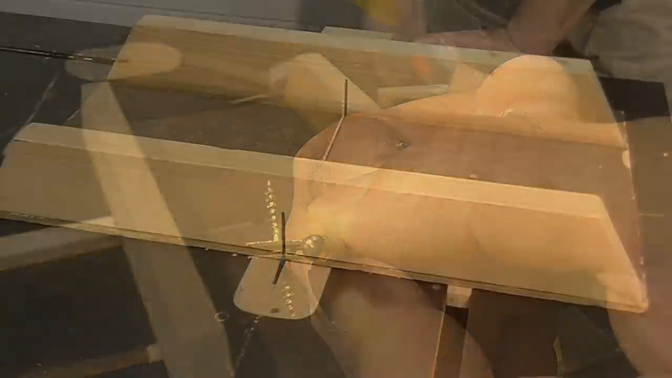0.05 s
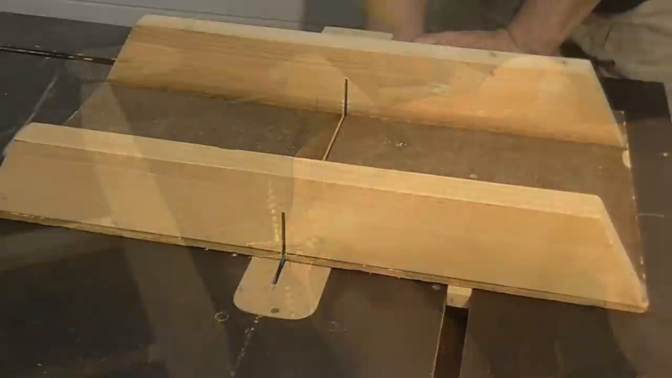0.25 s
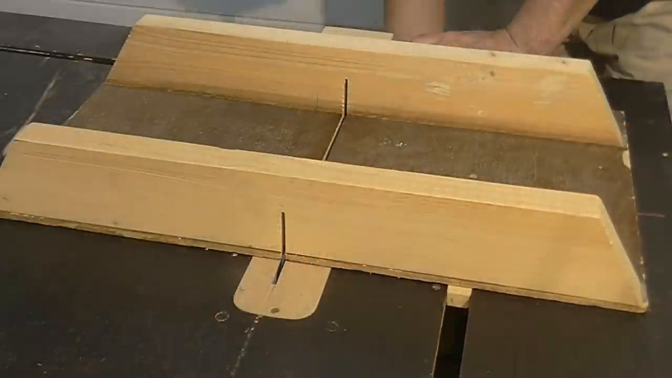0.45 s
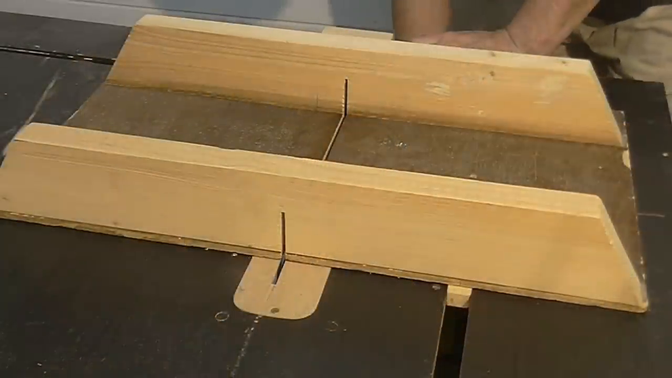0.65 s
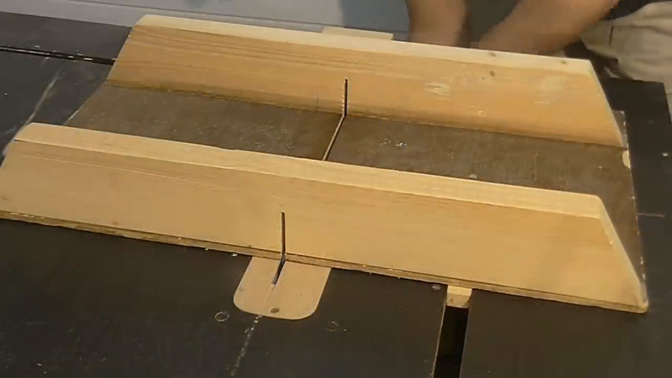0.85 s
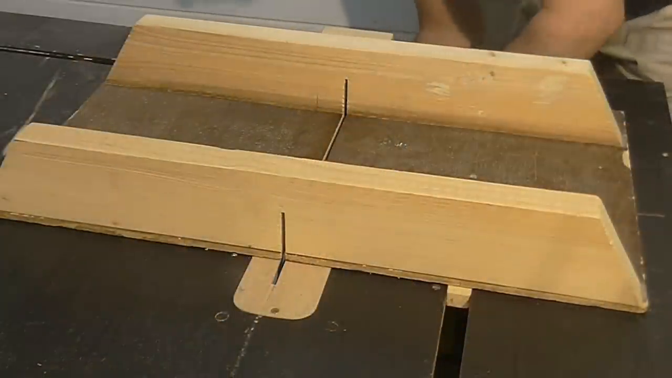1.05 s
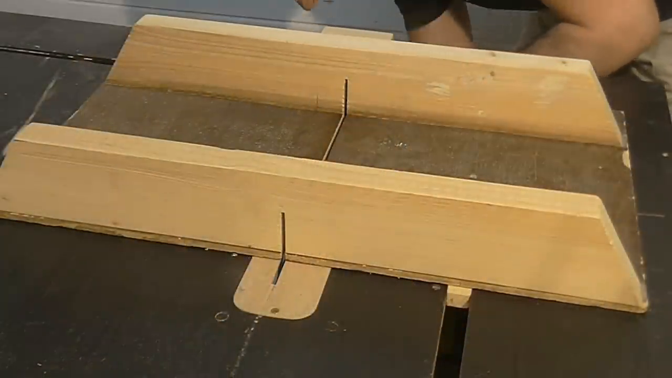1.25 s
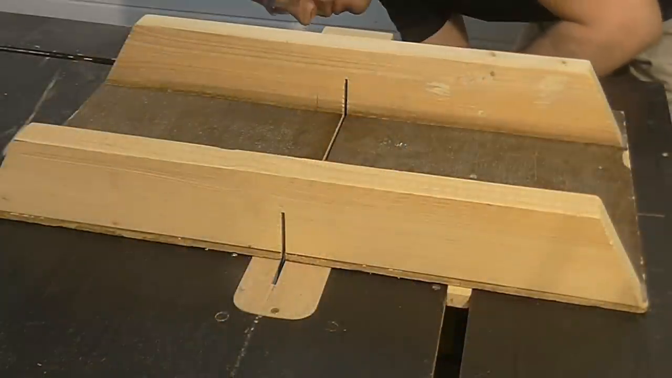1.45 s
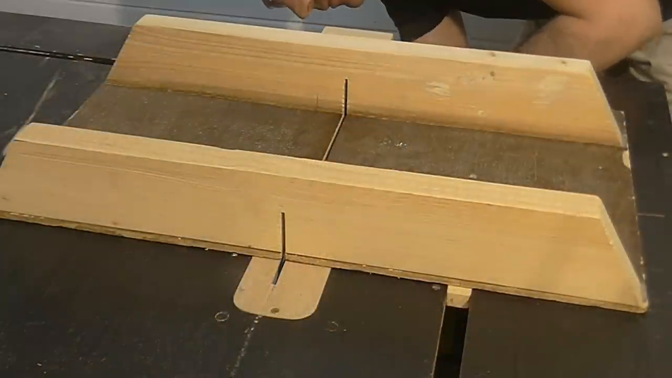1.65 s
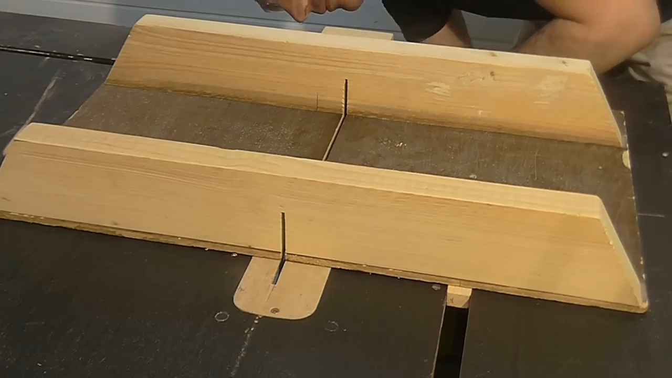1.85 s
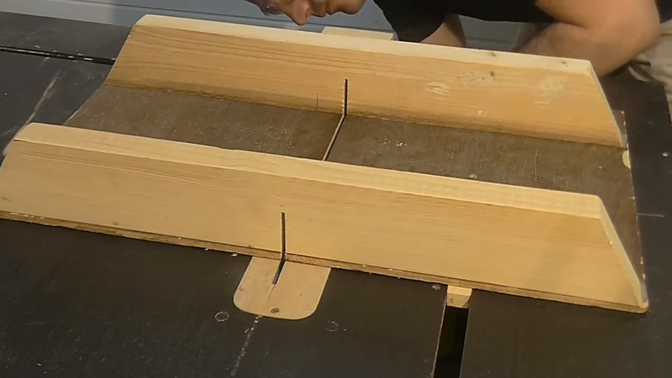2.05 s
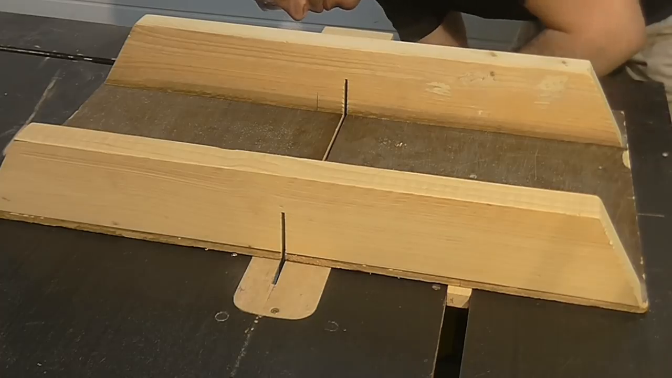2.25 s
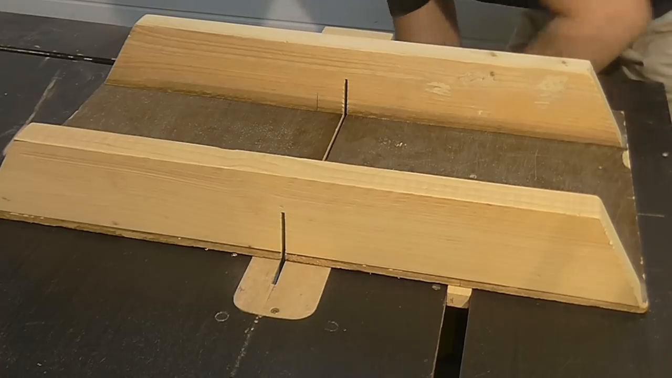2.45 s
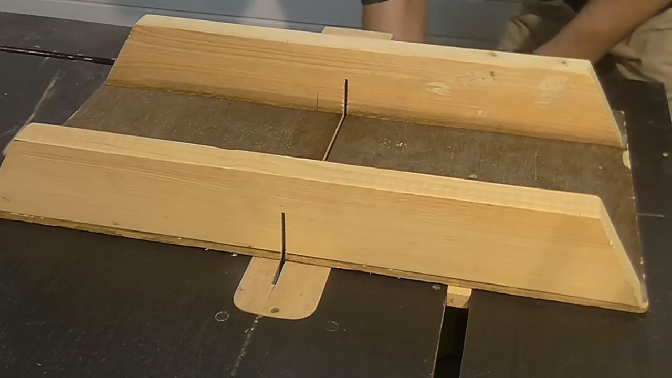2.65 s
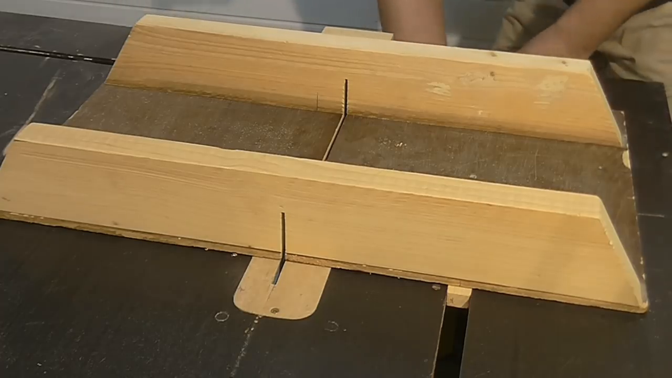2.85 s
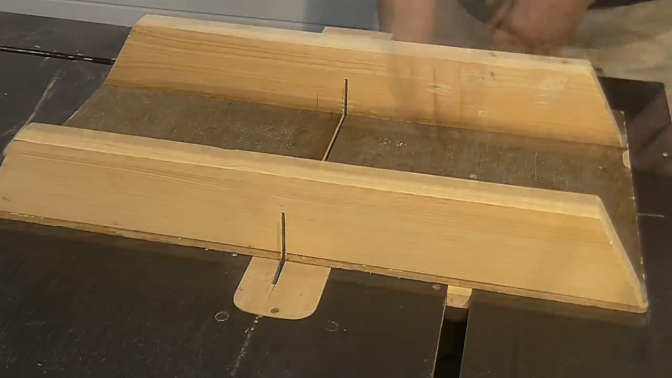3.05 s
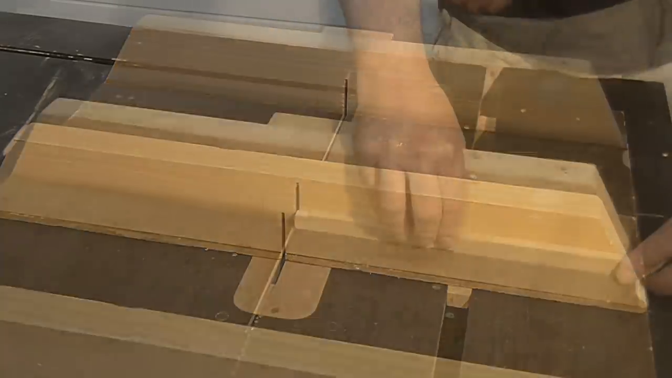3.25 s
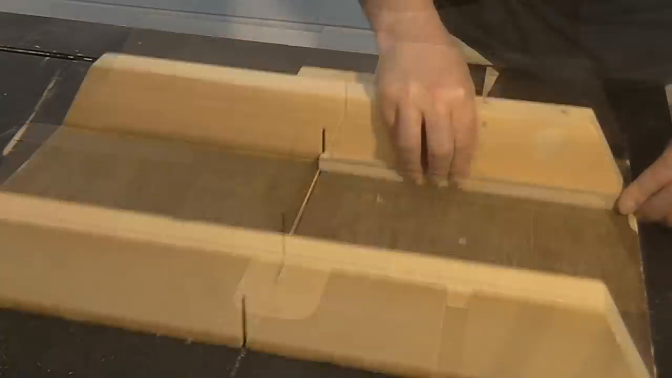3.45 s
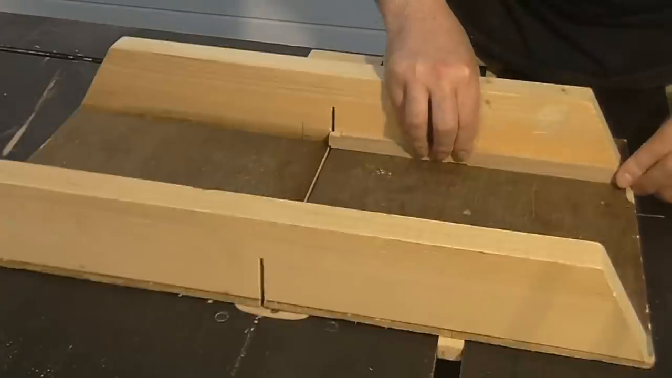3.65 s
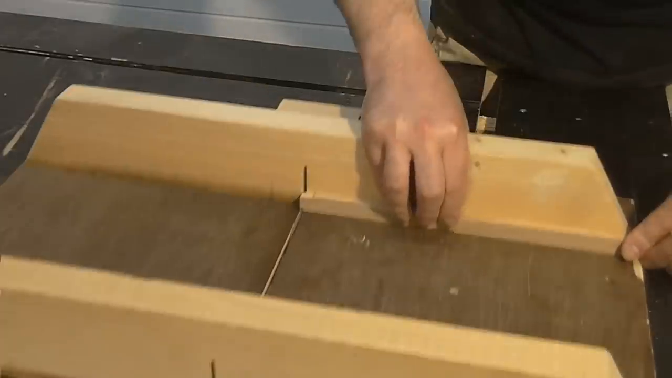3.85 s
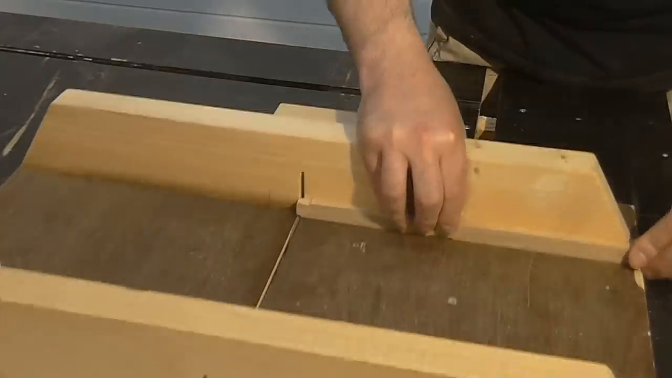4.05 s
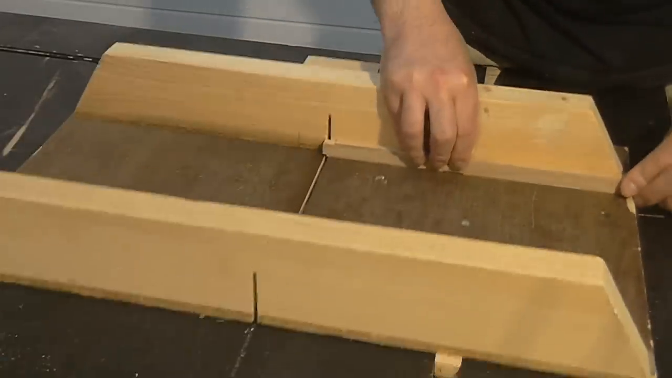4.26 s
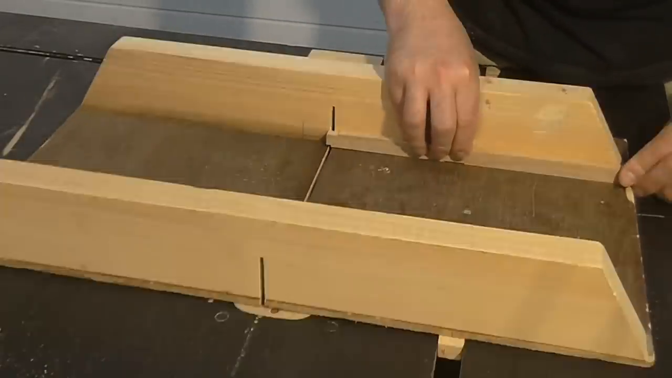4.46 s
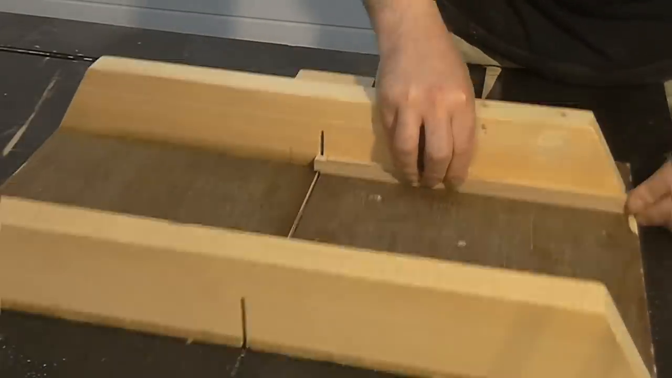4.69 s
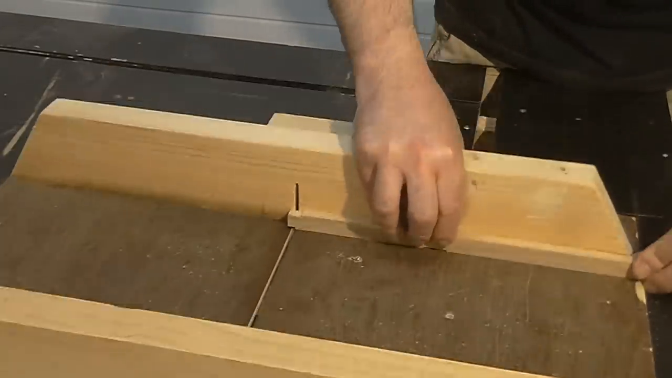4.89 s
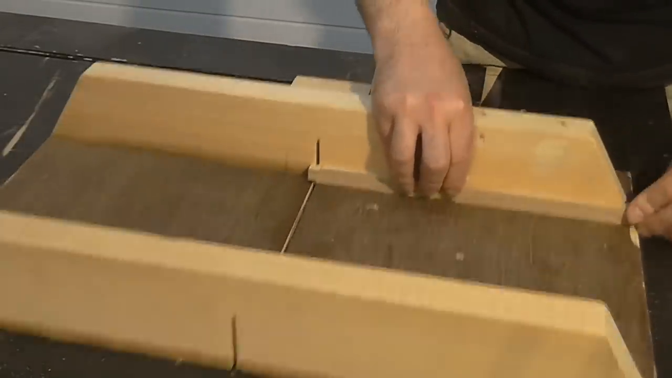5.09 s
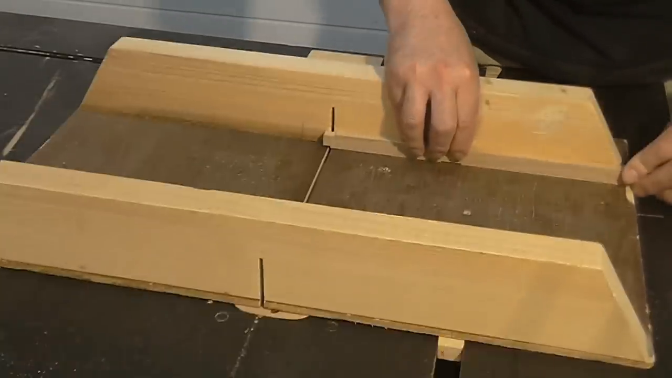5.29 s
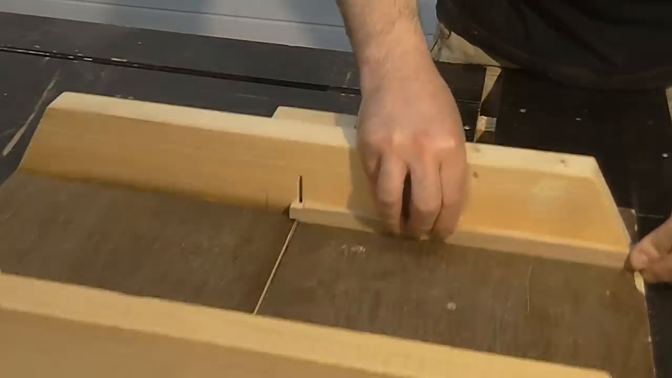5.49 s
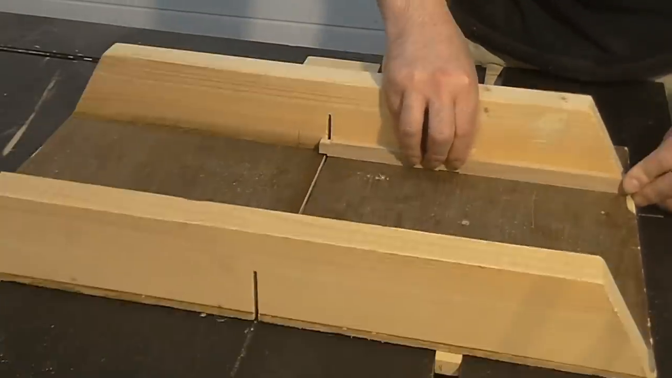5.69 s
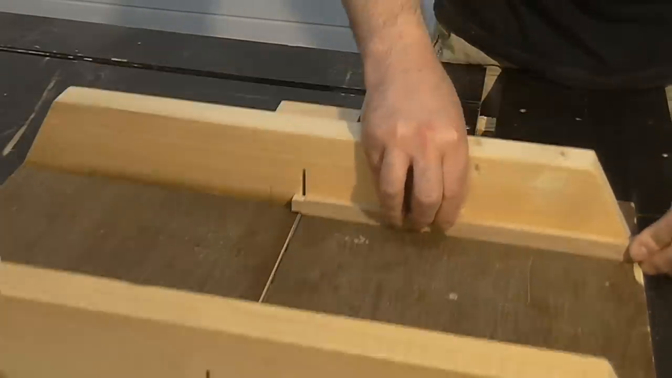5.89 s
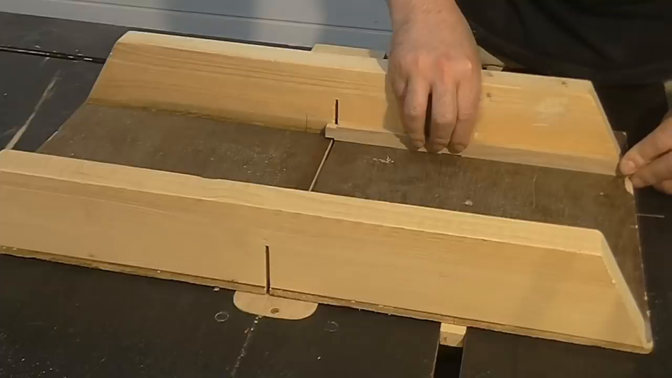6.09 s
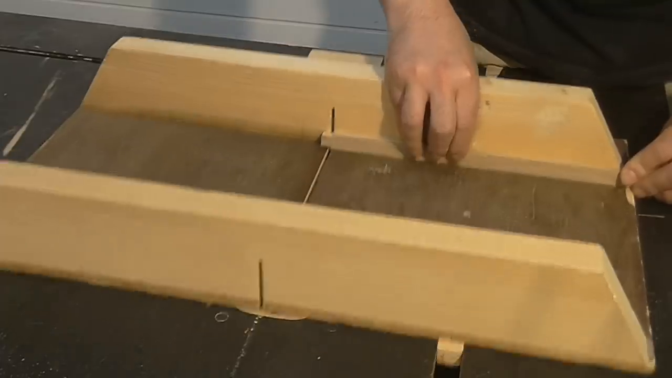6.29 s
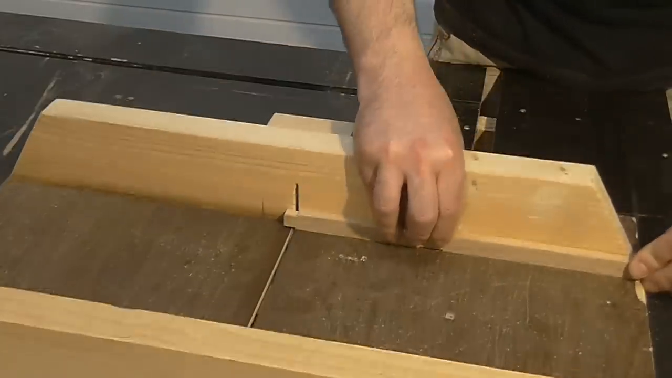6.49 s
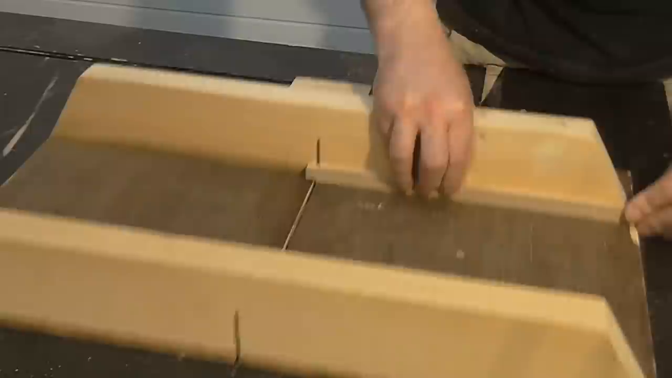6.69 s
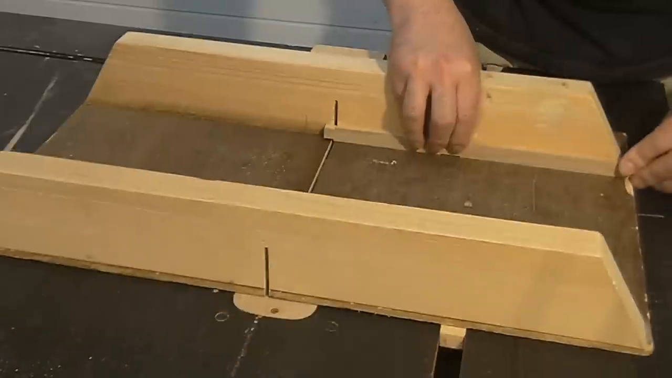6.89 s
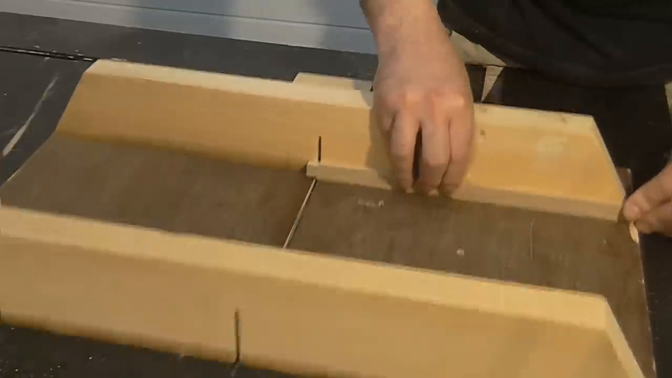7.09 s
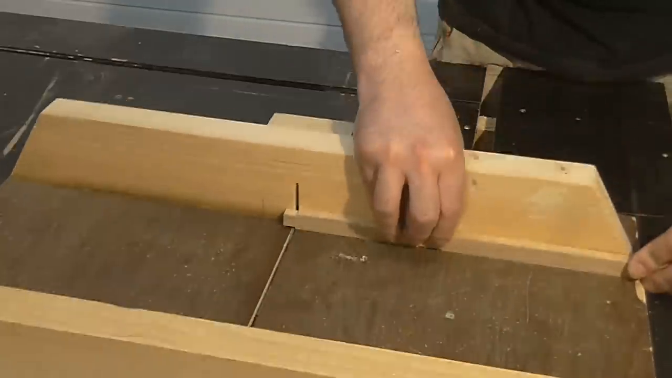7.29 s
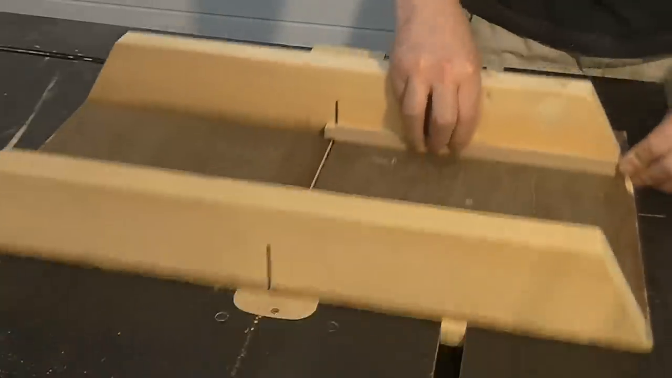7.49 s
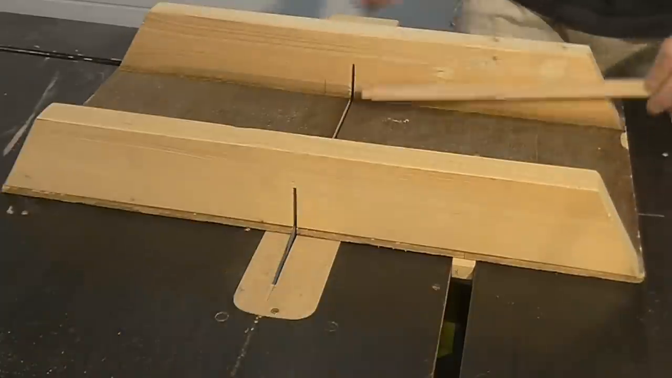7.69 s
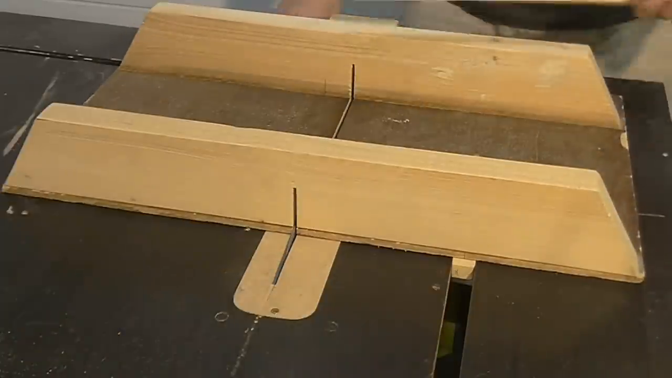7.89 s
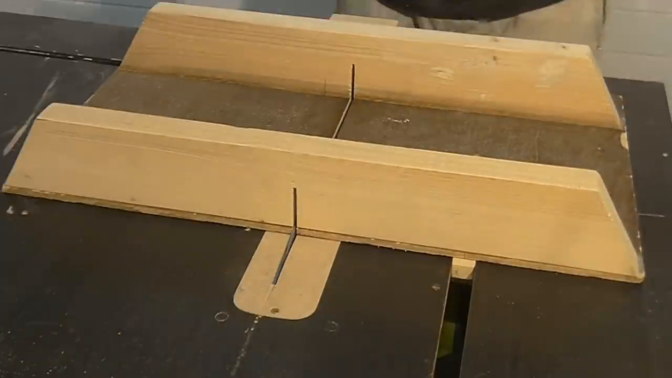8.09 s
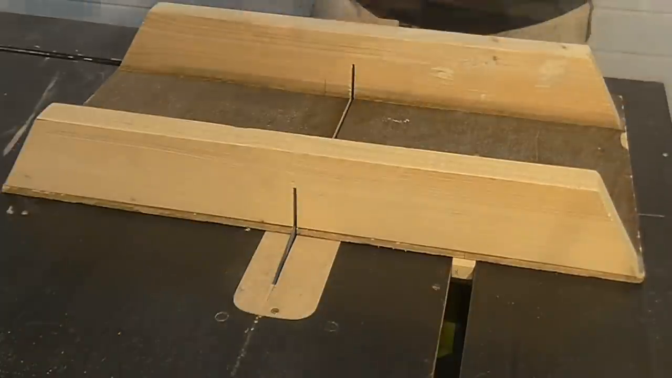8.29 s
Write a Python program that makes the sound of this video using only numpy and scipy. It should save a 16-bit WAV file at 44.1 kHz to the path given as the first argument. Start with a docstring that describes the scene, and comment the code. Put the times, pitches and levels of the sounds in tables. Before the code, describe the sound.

A wooden sled clunks and scrapes, a saw motor rises and holds a rough roar with a piercing whine that finally starts sliding down.

```python
"""In a quiet workshop, a wooden sled is knocked and slid about on a table saw, then the saw swells in.
Each knock is a burst of noise that rings the wood; sliding is gritty noise; both stop before long.
The running saw is a wavering noisy roar with fuzzy motor tones and the thin whine of the blade.
When the power is cut, the whine slides down in pitch and fades, with a second, lower stack of tones.
Echoes of the shop follow the knocks and the falling whine."""
import sys
import numpy as np
from scipy import signal
from scipy.io import wavfile
from scipy.ndimage import uniform_filter1d

SR = 44100
rng = np.random.default_rng(int(sys.argv[2]) if len(sys.argv) > 2 else 0)


def pcm_store(signal):
    """Save signal as 16-bit PCM."""
    levels = np.round(np.clip(np.atleast_2d(signal), -1, 1) * 32767)
    wavfile.write(sys.argv[1], SR, levels.astype(np.int16).T)


N = 367838
T = np.arange(N) / SR  # time in s
HANDLED = round(3.7 * SR)  # samples until the handling has died away

# The saw swells in, then holds: t/s, motor roar level/dB, blade wind level/dB (before its band offsets)
SAW_LEVELS = [(3.02, -52, -61), (3.39, -41, -48), (3.58, -39, -46.5), (4.0, -37.5, -44.5),
              (4.65, -37.5, -45), (5.6, -38.5, -45.5), (5.94, -37, -44.5), (6.3, -40, -47),
              (7.1, -40.5, -47.5), (7.35, -39, -46.5), (7.9, -39.5, -46.5), (8.34, -38.5, -49)]
# How alike left and right are in the shop: f/Hz, likeness (1 = the same)
SHOP_LIKENESS = [(60, 0.81), (380, 0.71), (2380, 0.58), (15000, 0.58)]


def amp(db):
    """Turns decibels into a gain."""
    return 10 ** (np.asarray(db) / 20)


def evened(x):
    """Scales a sound to rms 1."""
    return x / np.sqrt(np.mean(x ** 2) + 1e-20)


def read(points, hz):
    """Reads a curve over frequency, with straight lines on a log-frequency axis."""
    f, value = np.transpose(points)
    return np.interp(np.log(hz + 1), np.log(f + 1), value)


def curves(rows, t=T):
    """Reads all columns of a table at the times t; the first column is time."""
    s, *columns = np.transpose(rows)
    return [np.interp(t, s, column) for column in columns]


def wander(seconds):
    """Makes a random curve of rms 1 by smoothing noise twice over the given time."""
    size = max(round(seconds * SR), 1)
    smooth = uniform_filter1d(rng.standard_normal(N), size)
    return evened(uniform_filter1d(smooth, size))


def split(x, *edges_hz):
    """Cuts a sound into bands, low to high, each scaled to rms 1."""
    def cut(sound, hz, kind):
        return signal.sosfilt(signal.butter(4, hz, kind, fs=SR, output="sos"), sound)

    low = cut(x, edges_hz[0], "low")
    highs = [cut(x, hz, "high") for hz in edges_hz]
    middle = [cut(high, hz, "low") for high, hz in zip(highs, edges_hz[1:])]
    return [evened(band) for band in [low] + middle + [highs[-1]]]


def noise(spectrum, same, peaks=(), lean=((1, 0),), patchy_db=1.0, size=N):
    """Makes two-channel noise from random short-time spectra, with resonances and drifting patches."""
    frames, hz = size // 256 + 5, np.fft.rfftfreq(1024, 1 / SR)
    a, b, c, d, patches = rng.standard_normal((frames, 513, 5)).T
    patches = uniform_filter1d(patches, size=10, axis=0)
    patches = evened(uniform_filter1d(patches, size=10, axis=1))
    rings = sum((amp(db) - 1) / (1 + (2 * (hz - f) / width) ** 2) for f, width, db in peaks)
    colour = amp(read(spectrum, hz)) * (1 + rings)
    likeness = np.clip(read(same, hz), -1, 1)[:, None]
    left = a + 1j * b
    right = likeness * left + np.sqrt(1 - likeness ** 2) * (c + 1j * d)  # part shared, part its own
    z = np.array([left, right]) * colour[:, None] * amp(patchy_db * patches)
    z *= amp(np.outer([.5, -.5], read(lean, hz)))[:, :, None]
    return signal.istft(z, nperseg=1024, noverlap=768)[1][:, :size]


def tone(hz, level_db, blur_hz):
    """Makes a sine of the given rms level whose pitch trembles."""
    turns = np.cumsum(hz + blur_hz * wander(0.0049)) / SR
    return np.sqrt(2) * amp(level_db) * np.sin(2 * np.pi * turns)


def resonate(x, hz, width):
    """Rings at one pitch: a two-pole resonance; the narrower it is, the longer it rings."""
    r = np.exp(-np.pi * width / SR)
    return signal.lfilter([1, 0, -1], [1, -2 * r * np.cos(2 * np.pi * hz / SR), r * r], x)


def placed(x, lean_db):
    """Puts a mono sound in both channels; lean_db is left over right."""
    return np.array([x * amp(lean_db / 2), x * amp(-lean_db / 2)])


def roar():
    """Motor and blade wind ring the housing as noise; the whole roar wavers."""
    # Colour of the roar: f/Hz, level/dB per Hz (relative)
    colour = [(15, -59), (25, -84), (70, -17), (394, -5.5), (476, -2), (936, -6.5), (1840, -4.5),
              (2280, -13), (2690, -17), (3620, -7.5), (6050, -5.5), (7110, -4.5), (7920, -13.5),
              (14000, -25.5), (16000, -29)]
    # Resonances of the housing: f/Hz, width/Hz, level/dB
    housing = [(476, 48, 1.5), (758, 65, 3.5), (1860, 30, -3), (3480, 51, 4), (4190, 33, 3.5),
               (5250, 84, 2), (6760, 92, 2)]
    # How alike left and right are: f/Hz, likeness (1 = the same)
    likeness = [(60, 0.68), (130, 0.98), (290, 1), (640, 0.91), (1410, 0.81), (3100, 0.85), (6820, 0.8),
                (15000, 0.21)]
    # Lean to one side: f/Hz, left over right/dB
    side_lean = [(60, -2), (180, -4), (550, -3.5), (1650, 0), (4970, 0), (15000, -0.5)]
    ripple_hz = 46.9
    motor_db, wind_db = curves(SAW_LEVELS)
    air = noise(colour, likeness, housing, side_lean)
    low, middle, high = split(air, 3230, 9100)
    # a steady 46.9 Hz ripple in level
    ripple_db = 1.2 * np.sin(2 * np.pi * ripple_hz * T + .5 * wander(0.18))
    waver_db = 1.15 * wander(0.0052) + 0.32 * wander(0.084)
    wind = amp(wind_db + 8.5) * middle + amp(wind_db + 1.5) * high
    return amp(ripple_db + waver_db) * (amp(motor_db) * low + wind)


def blade():
    """The teeth chop the air: a whine and its octave at speed, then a falling glide with a second stack."""
    # Pitch of the whine at speed: t/s, f/Hz
    pitch = [(3.05, 7230), (3.6, 7204), (4.3, 7203), (5.05, 7208), (5.5, 7229), (5.8, 7234), (6.3, 7236),
             (6.75, 7226), (7.1, 7227), (7.5, 7249), (7.99, 7246)]
    # Loudness of the whine at speed: t/s, level/dB
    loudness = [(3.02, -53.5), (3.35, -42.5), (3.76, -39), (3.84, -43.5), (4.06, -41), (4.25, -47),
                (4.7, -39), (4.83, -51), (5.1, -41.5), (5.5, -32.5), (5.87, -37.5), (6.1, -34),
                (6.3, -39.5), (6.66, -35.5), (6.9, -39), (7.16, -36), (7.46, -43.5), (7.59, -35.5),
                (7.81, -42.5), (7.99, -41.5)]
    # Loudness of its octave: t/s, level/dB
    octave = [(3.02, -80), (3.45, -66), (4.3, -65), (4.8, -70), (5.4, -64), (6.1, -69), (7.0, -64),
              (7.3, -72), (7.99, -69)]
    # Tones of the second stack, before the glide's trim: level at the cut/dB, change/dB per s
    stack = [(-47, 5), (-56, 45), (-54, 31)]
    stack_share = .478  # lowest pitch of the stack as a share of the whine
    cut_s, coast_s = 7.995, .75  # power is cut; the speed then falls to 1/e in coast_s
    on, since = T < cut_s, np.maximum(T - cut_s, 0)

    (hz,), (whine_db,) = curves(pitch), curves(loudness)
    weak = np.clip(-32 - whine_db, 2, 14)  # dB below a steady whine
    hz = hz + weak * .7 * wander(.025)  # the weaker, the shakier
    waver_db = 1.4 * wander(0.0054) + 0.34 * weak * wander(0.034)
    octave_db = curves(octave)[0] + 4 * wander(.05) + 2.8 * wander(.02)
    whine = placed(tone(hz, whine_db + waver_db, 3.55), -2.8)
    whine = whine + placed(tone(2 * hz, octave_db, 14.0), 1.5)

    slow_hz = pitch[-1][1] * np.exp(-since / coast_s)
    coast_db = -36 - 25 * since  # fades as it slows
    coast = tone(slow_hz, coast_db + 4.0 * wander(.008), 70.0)
    for k, (db, db_per_s) in enumerate(stack, 1):
        level_db = db + db_per_s * since + 3.5 * wander(.008)
        coast = coast + tone(k * stack_share * slow_hz, level_db, k * 32.0)
    coast = placed(~on * coast, -.8)
    return on * whine + amp(-3.5) * coast + amp(-7.5) * shop_echoes(coast)  # echoes smear the glide


def motor_tones():
    """Noise through narrow resonances gives fuzzy tones that come and go while the motor pulls."""
    # Four tones: first level/dB, last level/dB, wavering/dB
    levels = [(-61, -54, 5), (-57.5, -56.5, 0.5), (-67, -65, 5), (-53, -54, 3)]
    # Their resonances: f/Hz, width/Hz
    resonances = [(1243, 40), (2080, 45), (13510, 200), (470, 45)]
    # Swells of the second tone: t/s, gain/dB, length/s
    swells = [(3.822, 14, 0.054), (4.363, 13, .04), (5.16, 7, .04), (6.6, 8.5, .3), (7.378, 7.5, 0.24),
              (7.843, 11.5, 0.32)]
    on_s, off_s = 3.3, 8.05
    tones = []
    for (first_db, last_db, waver_db), (hz, width) in zip(levels, resonances):
        level_db = np.interp(T, [on_s, off_s], [first_db, last_db]) + waver_db * wander(.06)
        fuzzy = resonate(resonate(rng.standard_normal(N), hz, width), hz, width)
        tones.append(amp(level_db) * evened(fuzzy))
    swell_db = sum(db * np.exp(-(2 * (T - s) / length) ** 2) for s, db, length in swells)
    tones[1] = amp(swell_db) * tones[1]
    pulling = (T > on_s) & (T < off_s)
    return placed(pulling * sum(tones), -.8)


def squeak():
    """A short squeak, a trembling tone with its octave, near the pitch of the second motor tone."""
    # Path of the squeak: t/s, f/Hz, level/dB
    path = [(3.52, 2075, -61), (3.535, 2060, -41), (3.56, 2075, -36.5), (3.58, 2050, -77)]
    hz, level_db = curves(path)
    heard = (T > path[0][0]) & (T < path[-1][0])
    return placed(heard * (tone(hz, level_db, 7.7) + tone(2 * hz, level_db - 3, 18.1)), .2)


def knocks():
    """Each contact is a burst of grit that rings the sled; thud, body and clack die at their own speed."""
    # Contacts: t/s, blow level/dB, thud above it/dB, clack above it/dB (before its mix),
    # rise/s, length of contact/s, dying time/s (60 dB of the body's fall)
    contacts = [(0.03, -53.5, -5, -3.5, 0.019, 0.042, 0.14), (0.16, -40.5, 6, 5, 0.012, 0.0045, 0.16),
                (0.485, -64.5, -6, -4, 0.0056, 0.028, 0.12), (0.575, -57.5, -15, -20, 0.0016, 0.003, 0.062),
                (0.654, -34, 6.5, -6, 0.0052, 0.0061, 0.12),
                (0.665, -27.5, -4.5, -6.5, 0.0017, 0.0061, 0.24),
                (0.797, -39.5, -7, -18, 0.022, 0.034, 0.14), (0.933, -57.5, 15, -16, 0.0036, 0.048, 0.16),
                (1.051, -44, 4.5, -9, 0.00083, 0.005, 0.16), (1.12, -43, 6, -5, 0.001, 0.0031, 0.071),
                (1.132, -41.5, -4, -30, 0.0042, 0.011, 0.11), (1.392, -59.5, 9.5, -19, 0.018, 0.022, 0.25),
                (1.545, -61, 5, -19.5, 0.0048, 0.02, 0.16), (1.608, -53, 12.5, -22, 0.001, 0.016, 0.07),
                (1.655, -64.5, 13, -24, 0.013, 0.01, 0.11), (1.772, -55, 13, -16, 0.003, 0.0073, 0.13),
                (1.885, -52, 10, -8, 0.0071, 0.01, 0.16), (2.004, -46, 4, -4, 0.0012, 0.008, 0.26),
                (2.058, -41.5, 2.5, -3.5, 0.0099, 0.022, 0.087), (2.234, -52, 9, -6, 0.014, 0.036, 0.15),
                (2.281, -35, 6, -9, 0.005, 0.019, 0.1), (2.394, -47.5, 1, -25, 0.001, 0.01, 0.13),
                (2.47, -45, 12, -18, 0.0031, 0.0073, 0.15), (2.482, -42, 13, -14, 0.0024, 0.008, 0.1),
                (2.514, -29, -3, -10.5, 0.01, 0.017, 0.18), (2.545, -34.5, -9, -3.5, 0.0024, 0.012, 0.14),
                (2.631, -25.5, 0, 4, 0.00031, 0.0061, 0.069), (2.66, -37.5, -31, -9, 0.0039, 0.0056, 0.23),
                (2.768, -38, 6, 1, 0.01, 0.0063, 0.18), (2.827, -36.5, -13, -1.5, 0.0029, 0.0025, 0.071),
                (2.922, -49, 8, -24, 0.001, 0.024, 0.13), (2.949, -29, -4.5, 2.5, 0.002, 0.0028, 0.15),
                (2.971, -29.5, -3, -2, 0.0042, 0.014, 0.088), (2.997, -39.5, 4, -7, 0.002, 0.0067, 0.31),
                (3.064, -37.5, 5.5, -1, 0.0018, 0.0054, 0.073),
                (3.089, -33.5, -22, -24, 0.0011, 0.0043, 0.05),
                (3.133, -45.5, 5, -16, 0.001, 0.0052, 0.079)]
    # Colour of the grit: f/Hz, level/dB per Hz (relative)
    wood = [(29, -58), (50, -75), (155, 0.5), (353, 2), (418, -3.5), (729, -5), (1270, -12), (2950, -21.5),
            (5150, -13), (6870, -22), (8140, -22), (14500, -38.5), (16000, -42)]
    # Resonances of the sled: f/Hz, width/Hz, level/dB
    sled = [(146, 60, 3), (263, 26, 1), (406.4, 22, 5), (610, 36, 8), (1107, 150, 1.5), (1460, 140, 7.5),
            (2180, 86, 7.5), (3770, 170, 3.5), (4180, 20, 7), (4440, 49, -3), (5440, 43, 5),
            (5500, 90, -1.5), (6500, 120, 7.5), (7200, 130, 1.5), (8070, 70, 2)]
    # Loudest ring of thud, body and clack: f/Hz, width/Hz, share added
    loudest = [(429, 43, 0.82), (1256, 260, 0.31), (4600, 1600, .2)]
    likeness = [(100, 0.97), (5000, 0.92), (15000, 0.54)]  # f/Hz, left-right likeness
    grit = noise(wood, likeness, sled, patchy_db=3.2, size=HANDLED)
    bands = split(grit, 885, 2880)
    age, out = np.arange(SR // 3) / SR, np.zeros((2, N))
    spray = evened(amp(2.4 * wander(0.0017)))  # the contact is a spray of tiny impacts
    snap = evened(np.diff(rng.standard_normal(len(age) + 2), 2)) * np.exp(-age / .0015)
    lean_db = -0.4 * np.array([[.5], [-.5]])  # left, right
    for s, blow_db, thud_db, clack_db, rise, touch, t60 in contacts:
        start = round(s * SR)
        at = slice(start, start + len(age))
        thud, body, clack = (evened(band[:, at] + share * evened(resonate(band[:, at], hz, width)))
                             for band, (hz, width, share) in zip(bands, loudest))
        fall = np.maximum(age - rise - touch, 0) / t60
        fall = fall + 0.22 * np.clip(age - rise, 0, touch) / t60  # the contact already slackens
        onset = np.minimum(age / rise, 1) ** 2
        clack_gain = 0.77 * amp(clack_db - 160 * fall) + 0.66 * amp(clack_db - 58 * fall)
        mix = amp(thud_db - 67 * fall) * np.minimum(age / (rise + 0.0047), 1) * thud
        mix = mix + amp(-60 * fall) * onset * body * np.sqrt(spray[at])
        mix = mix + clack_gain * onset * clack * spray[at]
        mix = mix + amp(clack_db - 1) * np.exp(-rise / 0.0014) * snap  # sudden blows snap most
        out[:, at] += amp(blow_db + lean_db) * mix
    return out


def rubbing():
    """Wood drags over the table: gritty rumble and hiss."""
    # Strength of the rubbing: t/s, rumble level/dB, deep rumble level/dB, hiss level/dB
    strokes = [(0.0, -55, -59, -66), (0.1, -65, -79, -61), (0.25, -71, -65, -74), (0.58, -65.5, -80, -74),
               (0.83, -46, -66, -57), (0.94, -57, -57, -77), (1.03, -56, -50.5, -75),
               (1.16, -50.5, -69, -77), (1.23, -69, -78, -72.5), (1.69, -62, -67, -75),
               (1.78, -50.5, -58, -60), (2.0, -46.5, -56.5, -59), (2.075, -46, -43, -59),
               (2.18, -52.5, -66, -56), (2.32, -45, -53, -60), (2.47, -64, -66, -79), (2.54, -47, -66, -39),
               (2.68, -70, -67, -76), (2.8, -49, -53, -49), (2.91, -63, -62, -70)]
    # Colour of the rubbing: f/Hz, level/dB per Hz (relative)
    colour = [(29, -57), (50, -70), (125, 3), (321, -8), (408, -18), (545, -3.5), (661, -9.5), (905, -9.5),
              (2620, -19), (5270, -14.5), (16000, -37)]
    rings = [(342, 33, 5.9), (560, 40, 2.8), (900, 120, 1.7), (1740, 210, 3.7)]  # f/Hz, width/Hz, level/dB
    t = T[:HANDLED]
    rumble_db, deep_db, hiss_db = curves(strokes, t)
    drag = noise(colour, SHOP_LIKENESS, rings, size=HANDLED)
    deep, rumble, hiss = split(drag, 247, 1760)
    grain = amp(0.55 * wander(0.0034)[:HANDLED])
    ending = np.clip((strokes[-1][0] - t) / 0.031, 0, 1)
    rubbed = amp(deep_db) * deep + amp(rumble_db) * rumble + amp(hiss_db) * hiss
    return np.pad(grain * ending * rubbed, ((0, 0), (0, N - HANDLED)))


def shop_echoes(x):
    """The shop answers with sparse echoes of random sign, each band dying at its own speed."""
    # How long echoes last: f/Hz, time to fall by 60 dB/s
    dying = [(150, 0.21), (600, 0.33), (2500, 0.27), (6000, 0.19), (12000, 0.2)]
    taps = np.zeros((2, SR // 2))
    slots = np.arange(300, SR // 2 - 20, 20)[None]
    at = slots + rng.integers(0, 20, (2, slots.size))  # one echo in every 20 samples
    np.put_along_axis(taps, at, rng.choice([-1., 1.], at.shape), 1)
    taps[1] = 0.49 * taps[0] + 0.74 * taps[1]  # right is partly like left
    hz, t, z = signal.stft(taps, SR, nperseg=256)
    tail = signal.istft(z * amp(-60 * t / read(dying, hz)[:, None]), SR, nperseg=256)[1]
    tail = tail / np.linalg.norm(tail[0])
    return signal.fftconvolve(x.mean(0)[None], tail, axes=1)[:, :N]


def quiet_shop():
    """The faint noise of the shop, which fades out under the running saw."""
    # Colour of the quiet: f/Hz, level/dB per Hz (relative)
    colour = [(15, -36), (25, -15), (92, 4), (293, 10), (394, 7), (607, -25.5), (2220, -20), (2840, -35),
              (8590, -14), (13600, -12.5), (16000, -27)]
    hush = evened(noise(colour, SHOP_LIKENESS, size=HANDLED))
    fade = np.clip((HANDLED / SR - T[:HANDLED]) / 0.38, 0, 1)
    return np.pad(amp(-67.5) * hush * fade, ((0, 0), (0, N - HANDLED)))


def scene():
    """Handling in the quiet shop, then the saw."""
    start = np.clip((T - SAW_LEVELS[0][0]) / 0.024, 0, 1)
    saw = (roar() + motor_tones() + blade()) * start
    hits = knocks()
    handling = hits + amp(-11.5) * shop_echoes(hits) + rubbing()
    return saw + squeak() + handling + quiet_shop()


def record(dry):
    """The level dips briefly once; a low-pass filter then removes the highest treble."""
    # The brief dip: t/s, level/dB
    dip = [(6.147, -2.5), (6.148, -19), (6.156, -5), (6.168, 0.5)]
    dipped = dry * amp(curves(dip)[0])
    low_pass = signal.firwin(511, 15850, window=("kaiser", 9), fs=SR)  # edge in Hz
    return signal.oaconvolve(dipped, low_pass[None], "same")


dry = scene()
out = record(dry)
pcm_store(out)
```